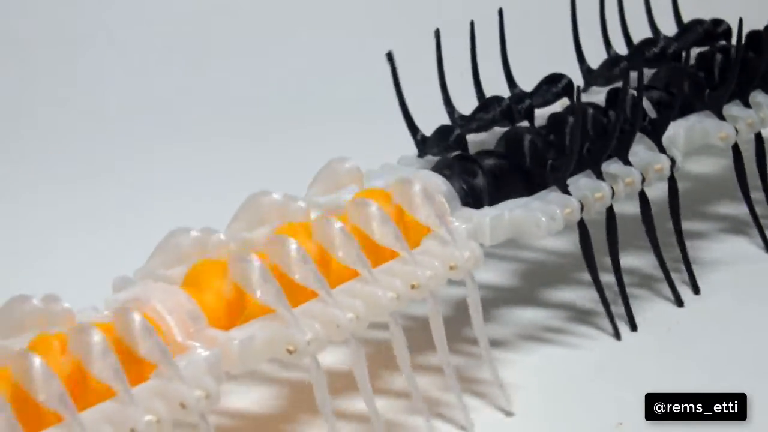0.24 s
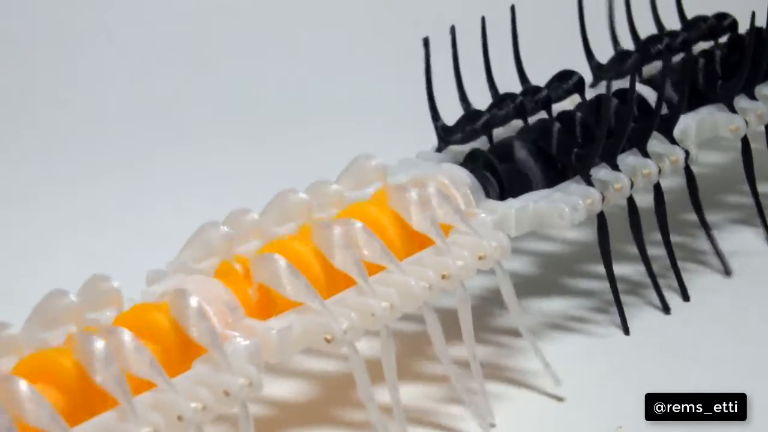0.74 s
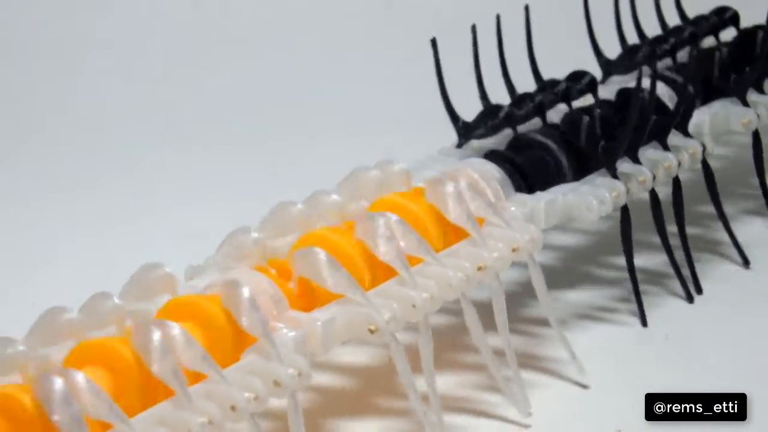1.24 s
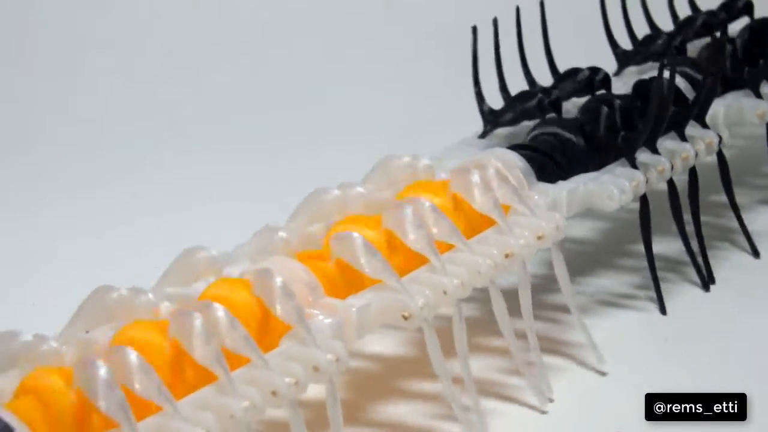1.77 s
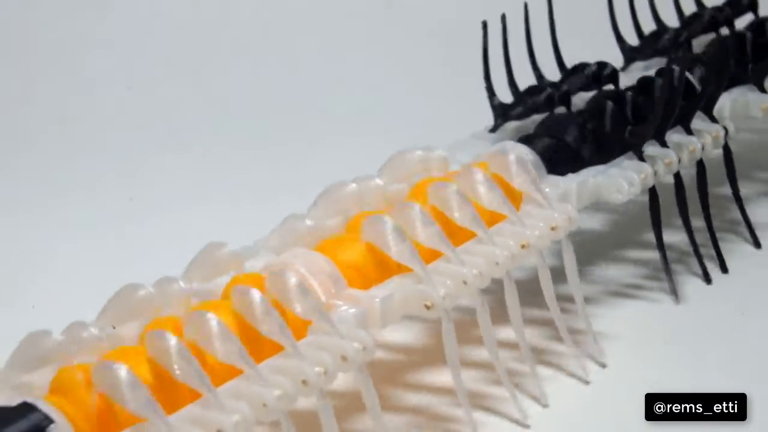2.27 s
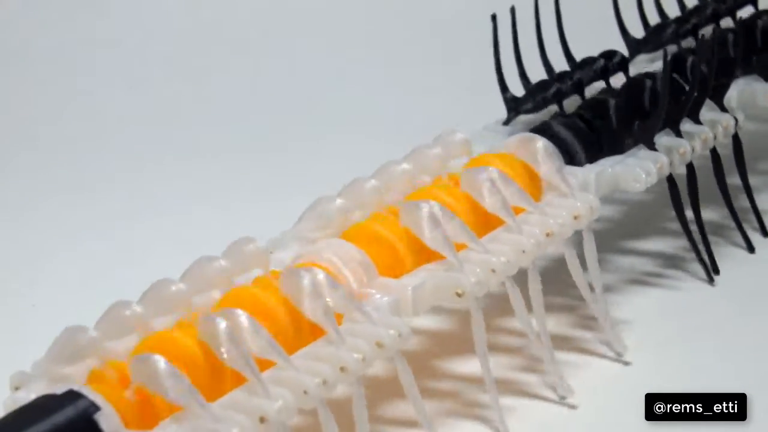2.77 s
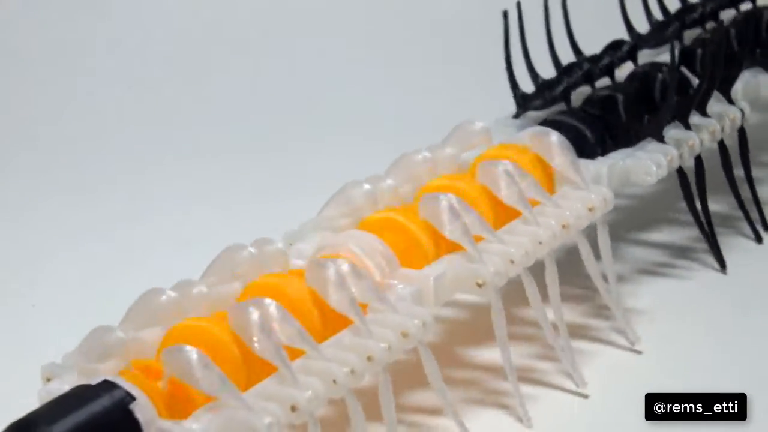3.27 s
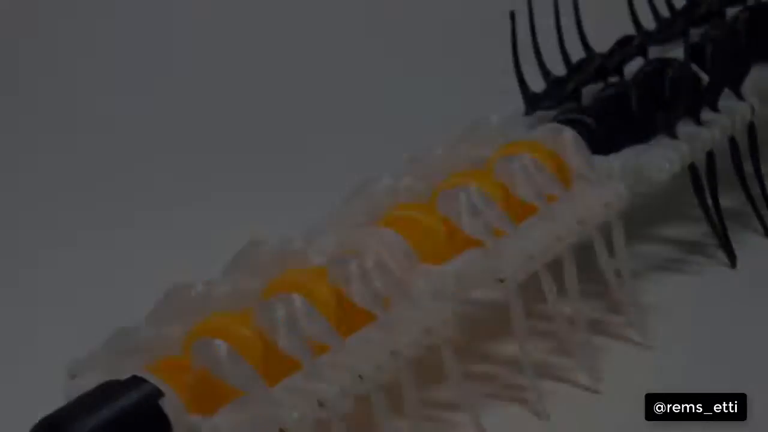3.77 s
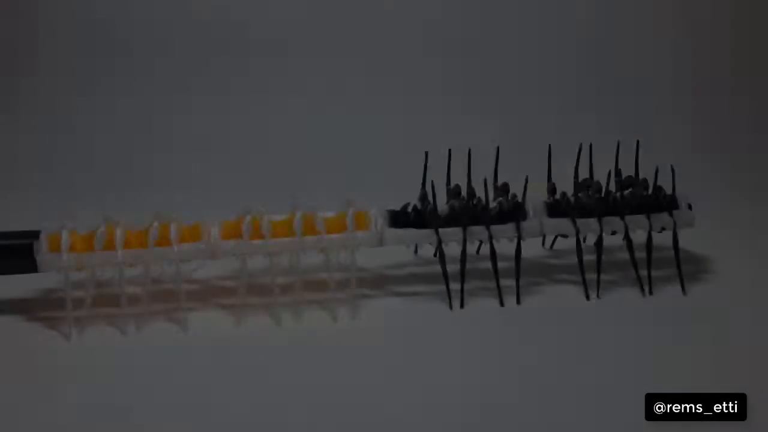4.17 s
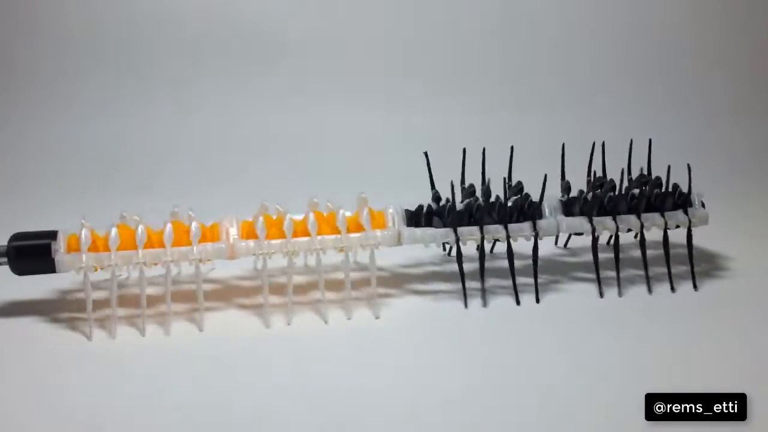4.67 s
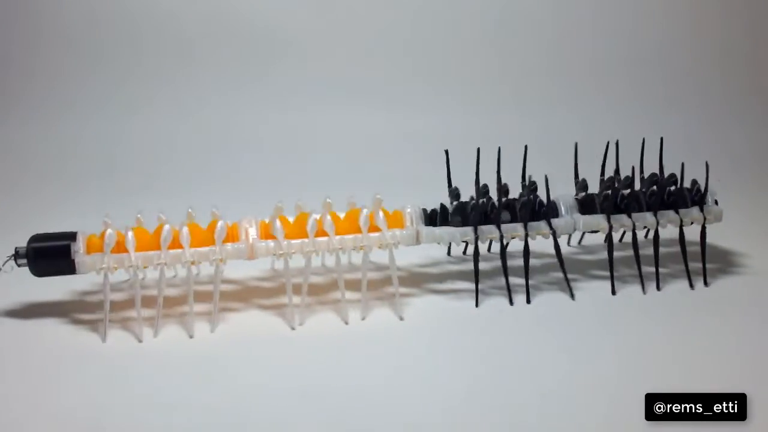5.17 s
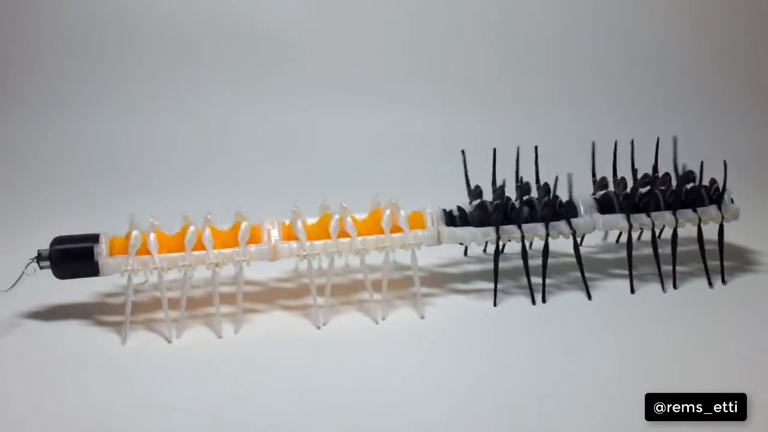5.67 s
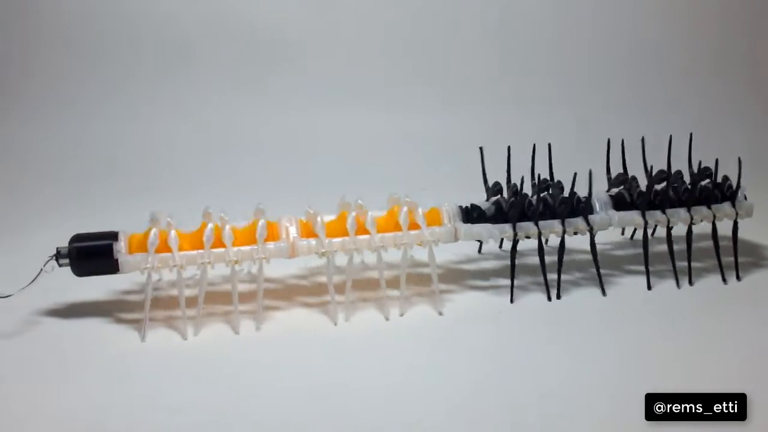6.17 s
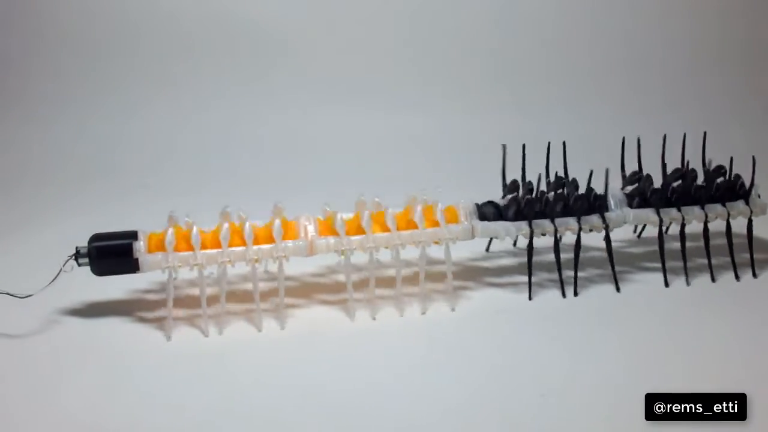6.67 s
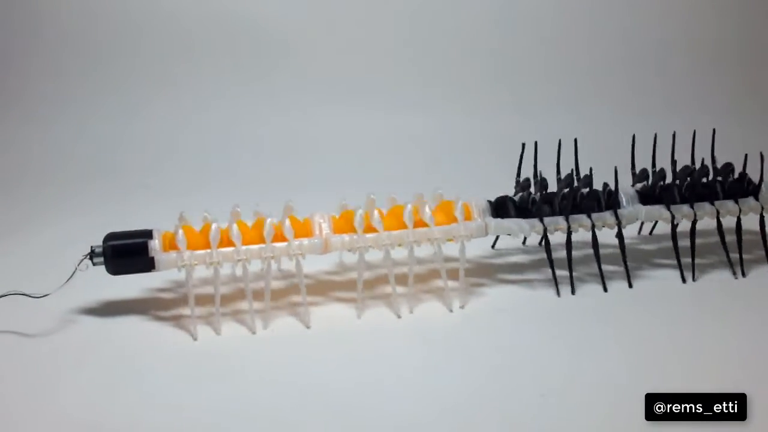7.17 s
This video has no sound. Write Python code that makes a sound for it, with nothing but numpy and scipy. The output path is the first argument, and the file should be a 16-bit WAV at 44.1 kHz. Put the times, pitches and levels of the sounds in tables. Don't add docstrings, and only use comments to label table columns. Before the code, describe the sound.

A small geared motor whirs with a bright, steady hiss while plastic joints squeak and tick in quick regular turns on a many-legged toy.

```python
import sys
import numpy as np
from scipy import signal
from scipy.io import wavfile

SR = 44100
rng = np.random.default_rng(int(sys.argv[2]) if len(sys.argv) > 2 else 0)


def how_loud(loudness_db):
    steps = np.asarray(loudness_db, float) / 20
    return 10 ** steps


def wrap_up_sound(samples):
    columns = np.atleast_2d(samples).T
    tamed = np.clip(columns, -1, 1)
    steps = np.round(tamed * 32767).astype(np.int16)
    wavfile.write(sys.argv[1], SR, steps)


N = 327222
TIME = np.arange(N) / SR

# start t/s, end t/s, shaft period/s, phase at t = 0 [0-1],
# low whine level/dB, high whine level/dB, half-speed whine level/dB
VIEWS = [
    (0, 4.55, .447, 0, -47, -47, -56.5),
    (3.54, 7.42, .449, .17, -47.5, -48.5, -55.5),
]
# f/Hz, width/Hz, near level/dB, far level/dB
FRAME = [(150, 8.4, 4.5, 2.5), (237, 15, 3, 3), (300, 22, 3, 4), (370, 36, 9, 1.5), (389, 50, -1, 6.5),
         (720.6, 40, 5.5, 5), (875, 145, 1.5, 2.5), (1340, 120, 5, 3), (1780, 240, 2.5, 3),
         (2392, 106, 4.5, 1), (3134, 1130, 3.5, 3), (5040, 360, 1.5, 1), (5900, 190, 4, 1.5)]


def in_time(rows):
    s, *columns = np.transpose(rows)
    return [np.interp(TIME, s, c) for c in columns]


def at_hz(points, hz):
    f, value = np.transpose(points)
    return np.interp(np.log(hz), np.log(f), value)


def far_share():
    return np.interp(TIME, [3.5, 4.6], [0, 1])


def low_noise(hz, size, channels):
    r = np.exp(-2 * np.pi * hz / SR)
    white = rng.standard_normal((channels, size + 800))
    x = signal.lfilter([1], [1, -2 * r, r * r], white)[:, 800:]
    return x / np.sqrt((1 + r * r) / (1 - r * r) ** 3)


def drift(rate_hz):
    size = N // 40 + 2
    return np.interp(np.arange(N) / 40, np.arange(size), low_noise(40 * rate_hz, size, channels=1)[0])


def stereo(mid, side, hz):
    # f/Hz, left-right likeness
    likeness = [(60, 0.32), (150, 0.76), (380, 0.83), (950, 0.73), (2380, 0.63), (5500, 0.26),
                (8000, -0.12), (10500, -0.042), (15000, -0.25)]
    # f/Hz, share heard a quarter cycle late on the right
    lateness = [(3000, -0.019), (4500, .1), (6300, 0.13), (8000, 0.15), (10500, 0.064), (12500, .05),
                (14000, -.1)]
    # f/Hz, left minus right level/dB
    left_right = [(60, -1), (130, -3), (290, -3.0), (640, -1.5), (1410, -5.5), (3100, -3.5), (6820, -2),
                  (15000, 1.5)]
    alike = np.clip(at_hz(likeness, hz), -.9, .9)
    late = np.clip(at_hz(lateness, hz), -.4, .4)
    lean = how_loud(at_hz(left_right, hz) / 2 * np.array([[1], [-1]]))
    delayed = -np.gradient(mid) / np.sin(2 * np.pi * hz / SR)
    unlike = np.sqrt(max(1 - alike ** 2 - late ** 2, 0))
    return lean * np.array([mid, alike * mid + late * delayed + unlike * side])


def rough_tone(hz, width_hz, clean):
    a, b, c, d = low_noise(width_hz / 2, len(hz), channels=4) * np.sqrt(1 - clean)
    steady = np.sqrt(2 * clean)
    angle = 2 * np.pi * np.cumsum(hz) / SR
    mid = (a + steady) * np.sin(angle) + b * np.cos(angle)
    side = c * np.sin(angle) + (d + rng.choice([-1, 1]) * steady) * np.cos(angle)
    return stereo(mid, side, np.mean(hz))


def effort():
    # part of turn [0-1], level/dB
    load = [(0, -0.6), (.12, -1.5), (.27, 0.2), (.35, -1.4), (.5, -0.7), (.62, 0.5), (.75, 1.53),
            (.87, 1.3), (1, -0.5)]
    # t/s, level/dB
    nearness = [
        [(0, -1.5), (1.5, -1.96), (1.9, -0.4), (3.2, -0.5), (4.55, 0)],
        [(3.54, 0.5), (4.7, -0.5), (5.1, -0.7), (7.42, 0.2)],
    ]
    cams, hiss = 1e-9, 1e-9
    for (start, end, turn_s, phase, *_), approach in zip(VIEWS, nearness):
        on = (TIME >= start) & (TIME <= end)
        near_db, = in_time(approach)
        load_db = np.interp((TIME / turn_s + phase) % 1, *np.transpose(load))
        load_db = load_db + 0.51 * drift(5.1)
        cams = cams + on * how_loud(2 * (near_db + load_db))
        hiss_db = -1.34 + 0.44 * near_db + 0.17 * load_db
        hiss = hiss + on * how_loud(2 * hiss_db)
    return 10 * np.log10(cams), 10 * np.log10(hiss)


def rubbing(cams_db, hiss_db, patchy_db=1.39, shared_db=0.35, chatter_db=1.0):
    # t/s, level/dB
    rumble = [(0, -5.5), (.5, -3.5), (2.2, -2.5), (2.78, -1), (2.85, 3), (3.38, 3.5), (3.45, 1), (3.55, 6),
              (4.54, 5.5), (4.58, 0.5), (5.8, -1.3), (6.2, 1.5), (7.05, -0.5), (7.42, 0)]
    # f/Hz, level/dB per Hz
    near = [(18, -59), (30, -29), (118, -8.5), (189, -7), (374, -6), (526, -8.5), (721, -5), (1070, -3),
            (1860, 1), (2060, 0), (2350, -0.5), (5040, -1.5), (7270, -4), (14800, -0.5), (16000, -37)]
    # f/Hz, level/dB per Hz
    afar = [(18, -59), (30, -19), (70, -33), (115, -9), (189, -10.5), (384, -6), (473, -9), (1280, -1),
            (1460, -1), (1760, 0), (5900, -3), (8080, -5.5), (11700, -0.5), (14800, -6), (16000, -35)]
    rumble_db = in_time(rumble)[0] + 1.1 * drift(9.2)
    far = far_share()
    white = rng.standard_normal((2, 2, N))
    grainy = white * how_loud(chatter_db * low_noise(310, N, channels=1))
    together = drift(14)
    bounds_hz = 22 * 2 ** np.arange(0, 9.7, 1 / 3)
    out = 0
    for k, (low, high) in enumerate(zip(bounds_hz, bounds_hz[1:])):
        hz = min(np.sqrt(low * high), 14500)
        source = grainy if hz > 1800 else white
        third_octave = signal.butter(2, [low, high], "band", fs=SR, output="sos")
        mid, side = signal.sosfilt(third_octave, source[k % 2])
        if hz < 330:
            effort_db = rumble_db
        elif hz < 1000:
            effort_db = .7 * cams_db
        else:
            effort_db = cams_db if hz < 10500 else hiss_db
        colour_db = (1 - far) * at_hz(near, hz) + far * at_hz(afar, hz)
        flicker_db = np.clip(hz / 4000, .2, 1) * (shared_db * together + patchy_db * drift(31.0))
        out = out + how_loud(colour_db + effort_db + flicker_db) * stereo(mid, side, hz)
    return how_loud(-28.5) * out


def body(x):
    # f/Hz, width/Hz, near level/dB, far level/dB
    can = [(11060, 200, 1, 0), (11450, 250, 1, 0.5), (12700, 150, 4.5, -1)]
    out, far = x.copy(), far_share()
    for hz, width_hz, near_db, far_db in [*FRAME, *can]:
        r = np.exp(-np.pi * width_hz / SR)
        lift = (1 - far) * how_loud(near_db) + far * how_loud(far_db) - 1
        poles = [1, -2 * r * np.cos(2 * np.pi * hz / SR), r * r]
        out += lift * signal.lfilter([(1 - r * r) / 2, 0, (r * r - 1) / 2], poles, x)
    return out


def whines(wobble_hz=170, flutter_db=4.0):
    # part of turn [0-1], low f/Hz, low level/dB, high f/Hz, high level/dB
    gear_turn = [(0, 11400, 6, 14500, 2), (.1, 11760, 5, 14900, 6), (.25, 12500, 2, 15660, 3),
                 (.36, 11500, 2.5, 14600, 3), (0.49, 10550, 4, 13800, -3), (.6, 11140, -2, 14500, 3),
                 (.72, 12300, -5, 15500, 3), (.88, 11600, 0.5, 14800, 2), (1.001, 11300, 4.5, 14400, 0)]
    # low, high, half-speed width/Hz
    widths_hz = (600, 800, 220)
    out = np.zeros((2, N))
    part, low_hz, low_db, high_hz, high_db = np.transpose(gear_turn)
    pitches, swells = (low_hz, high_hz, low_hz / 2), (low_db, high_db, low_db)
    for start, end, turn_s, phase, *levels_db in VIEWS:
        on = slice(int(start * SR), int(end * SR))
        at = (TIME[on] / turn_s + phase) % 1
        for hz, db, width_hz, level_db in zip(pitches, swells, widths_hz, levels_db):
            pitch = np.interp(at, part, hz) + wobble_hz * drift(9)[on]
            loudness_db = level_db + np.interp(at, part, db) + flutter_db * drift(38)[on]
            out[:, on] += how_loud(loudness_db) * rough_tone(pitch, width_hz, clean=0)
    return out


def hum():
    # f/Hz, rms level/dB
    mains = [(59.8, -80), (120, -66)]
    lines = sum(how_loud(db + 6 + 1.3 * drift(3.1)) * np.sin(2 * np.pi * hz * TIME) for hz, db in mains)
    return lines * how_loud(np.array([[-1.2], [1.2]]))


def flecks(cams_db, level_db=-50, spread_db=-1.0, length_s=.045, width_hz=55, scatter=0.0703):
    when, mode, off, long, glide, force = rng.random((450, 6)).T
    s = when * 7.38
    hz = np.array(FRAME)[5 + (mode * 8).astype(int), 0] * (1 + scatter * (2 * off - 1))
    db = level_db + 1.07 * cams_db[(s * SR).astype(int)] + spread_db * (2 * force - 1)
    db = db - 4.3 * abs(np.log2(hz / 2400))
    end_hz = hz * (1 + 0.041 * (glide - .6))
    return list(zip(s, length_s * (.5 + long), hz, end_hz, width_hz + 0 * s, db, 0 * s))


def widened(rows):
    return [(s, length, a_hz, b_hz, 27 + 0.032 * a_hz, db, 0) for s, length, a_hz, b_hz, db in rows]


def looped_slips(spread_db=2.5):
    # part of turn [0-1], length/s, start f/Hz, end f/Hz, level/dB
    rough_spots = [
        [(.52, 0.017, 4680, 4600, -52), (0.5, .063, 8830, 11000, -53), (0.5, 0.057, 2200, 2370, -46),
         (.55, .1, 5700, 4700, -50), (.62, .07, 3000, 3400, -49.5), (.72, 0.065, 3300, 3400, -48.5),
         (.19, 0.025, 6550, 5900, -55)],
        [(.62, 0.069, 8830, 11000, -52), (.52, .07, 5400, 5800, -49.5), (.68, .05, 4400, 5300, -53),
         (.6, .08, 5400, 4600, -47.5), (.14, 0.084, 2950, 3350, -47.5), (.05, .03, 5050, 5100, -46),
         (.69, 0.073, 2780, 2500, -45.5), (.8, 0.064, 1720, 1680, -53.5)],
    ]
    rows = []
    for (start, end, turn_s, phase, *_), spots in zip(VIEWS, rough_spots):
        for count in range(18):
            for (part, *shape, db), luck in zip(spots, rng.standard_normal((len(spots), 2))):
                s = (count + part - phase) * turn_s + .004 * luck[0]
                if start < s < end - .02:
                    rows.append((s, *shape, db + spread_db * luck[1]))
    return widened(rows)


def joint_slips():
    # t/s, length/s, level/dB
    long_joint = [(.249, 0.069, -41), (.707, .022, -42.5), (1.148, 0.11, -44), (1.595, 0.063, -42.5),
                  (2.037, 0.06, -41), (2.485, 0.058, -43.5), (2.971, .012, -36), (3.753, 0.067, -35),
                  (4.215, .07, -38.5), (4.668, 0.064, -35.5), (5.112, .058, -37), (5.572, 0.073, -39),
                  (6.01, 0.06, -38.5), (6.464, .08, -39.5), (6.908, 0.064, -42), (7.344, 0.066, -38.5)]
    long_octave = [(3.76, .04, -40), (4.225, .03, -44), (5.117, .046, -45), (6.014, .035, -40.4),
                   (6.907, 0.048, -39), (7.349, .021, -39.5)]
    long_tail = [(4.28, 0.043, -47), (4.73, 0.063, -44), (5.17, 0.04, -45), (5.64, .04, -43),
                 (6.075, .04, -38.5), (6.54, .04, -42)]
    low_joint = [(.569, 0.014, -38), (1.012, 0.03, -39), (1.069, 0.012, -39), (1.455, 0.024, -41),
                 (1.91, 0.023, -39), (1.963, .027, -43), (2.06, .05, -48), (2.354, 0.028, -40),
                 (2.55, 0.061, -44), (2.8, 0.033, -41), (3.25, .012, -37.5), (4.212, 0.012, -39),
                 (6.382, .019, -46), (7.3, 0.036, -45)]
    low_afar = [(4.988, 0.011, -38), (5.44, 0.02, -40), (5.875, .022, -44), (6.33, .019, -42),
                (6.78, .02, -45), (7.23, 0.018, -43)]
    falling_joint = [(.62, 0.027, -39), (1.047, .017, -39), (1.515, 0.028, -39), (1.939, 0.021, -36),
                     (2.38, .048, -38), (2.846, 0.049, -36.5), (3.276, .057, -37), (3.737, .02, -38),
                     (4.113, 0.02, -42), (4.193, 0.051, -39), (4.566, 0.0337, -36.5), (5.014, 0.037, -43.5),
                     (5.47, .03, -43), (5.936, .024, -39.5), (6.386, .021, -42), (7.261, 0.031, -42)]
    falling_tail = [(1.96, .03, -43), (2.41, .035, -44), (2.885, 0.039, -43), (3.315, 0.032, -40)]
    tick_joint = [(.89, 0.017, -41), (1.37, 0.017, -41), (1.904, .011, -39), (1.98, .015, -42),
                  (2.347, .018, -35.3), (2.715, 0.01, -37), (2.785, 0.018, -40), (3.154, .027, -39),
                  (3.612, 0.018, -36), (4.155, .018, -40), (6.965, .015, -44)]
    ping_joint = [(.214, .025, -37.5), (1.575, .017, -38.5), (2.459, 0.014, -38), (2.906, 0.024, -38),
                  (2.945, .036, -41), (3.396, 0.02, -33.5), (3.858, 0.016, -35)]
    ping_octave = [
        (3.395, .021, -36.5),
        (4.315, .021, -35),
    ]
    high_joint = [(.592, 0.033, -33.5), (1.488, 0.02, -34.5), (2.823, .025, -33), (3.155, .02, -36),
                  (3.676, .034, -36), (4.586, 0.066, -41), (5.049, .077, -44), (5.457, .033, -36.5),
                  (5.91, .035, -40), (6.36, 0.028, -39), (6.807, 0.019, -33.5)]
    rising_joint = [(.205, 0.027, -40.6), (.652, .03, -43), (1.099, .03, -45), (1.994, .037, -46),
                    (2.445, .02, -44), (3.329, .034, -41), (5.509, .038, -46), (5.961, .028, -40.6),
                    (6.415, .03, -44)]
    snap_joint = [(.843, .024, -36), (1.298, .016, -34), (1.745, .017, -37), (2.187, .022, -35),
                  (3.083, .021, -38), (4.442, .035, -32.5)]

    def sing(rows, start_hz, end_hz, width_hz, glide=0, flat_hz=0):
        return [(s, length, start_hz, end_hz + glide * length, width_hz, db, flat_hz)
                for s, length, db in rows]

    return (sing(long_joint, 2880, 2850, 80, glide=-1100, flat_hz=150)
            + sing(long_octave, 5680, 5650, 180, flat_hz=244)
            + sing(long_tail, 2720, 2540, 120)
            + sing(low_joint, 2390, 2360, 190)
            + sing(low_afar, 2500, 2460, 120)
            + sing(falling_joint, 6090, 6090, 160, glide=-5000)
            + sing(falling_tail, 5100, 5000, 350)
            + sing(tick_joint, 4970, 5080, 380)
            + sing(ping_joint, 4640, 4620, 190)
            + sing(ping_octave, 9150, 9110, 200)
            + sing(high_joint, 11070, 11400, 420, glide=-6000)
            + sing(rising_joint, 10520, 10620, 280)
            + sing(snap_joint, 12280, 12160, 610))


def stray_slips():
    # t/s, length/s, start f/Hz, end f/Hz, level/dB
    strays = [(.405, .082, 11560, 12200, -42), (.851, .028, 13560, 13310, -39.4),
              (.946, .011, 14070, 14090, -39), (1.296, 0.018, 13400, 13210, -39),
              (1.872, .053, 9460, 9300, -46), (2.462, .054, 14140, 14730, -49),
              (2.763, .018, 6570, 6510, -42.4), (2.875, .017, 1780, 1730, -42),
              (3.292, 0.026, 1246, 1340, -40), (3.722, .027, 1740, 1933, -38),
              (3.99, 0.019, 11800, 11900, -42), (4.022, .022, 1440, 1570, -39),
              (4.04, .05, 11300, 12200, -37), (4.093, .027, 14670, 15220, -35),
              (6.744, .022, 6180, 6530, -41), (6.765, .045, 15440, 15430, -45),
              (7.194, 0.024, 6580, 6660, -50), (7.2, 0.25, 150, 152, -59), (7.226, .044, 15350, 15370, -45)]
    return widened(strays)


def squeaks(rows, boost_db=3.0, clean=0.6):
    out = np.zeros((2, N))
    for s, length, start_hz, end_hz, width_hz, db, flat_hz in rows:
        i = int(s * SR)
        part = np.linspace(0, 1, int(length * SR))[:N - i]
        swell = np.sin(np.pi * part ** 0.79) ** 0.32
        onset_hz = flat_hz * np.exp(-part * length / 0.0113)
        glide_hz = (end_hz - start_hz) * np.clip(1.2 * part, 0, 1.1) ** 2.18
        tone = swell * rough_tone(start_hz - onset_hz + glide_hz, max(width_hz, 30), clean)
        out[:, i:i + len(part)] += how_loud(db + boost_db - 1.5) * tone / np.sqrt(np.mean(tone ** 2))
    return out


def ticks(rows, low_hz, high_hz, decay_s, under_db):
    out, t = np.zeros((2, N + 2000)), np.arange(2000) / SR
    envelope = (1 - np.exp(-t / 0.00074)) * np.exp(-t / decay_s)
    for s, db in rows:
        i = int(s * SR)
        out[:, i:i + len(t)] += how_loud(db - under_db) * envelope * rng.standard_normal((2, len(t)))
    band = signal.butter(2, [low_hz, high_hz], "band", fs=SR, output="sos")
    mid, side = signal.sosfilt(band, out[:, :N] + 1e-18) * np.sqrt(SR / 2 / (high_hz - low_hz))
    return stereo(mid, side, np.sqrt(low_hz * high_hz))


def cam_drops():
    # t/s, peak level/dB
    bright = [(0.0368, -23), (0.2314, -21), (0.4344, -27), (0.4818, -26), (0.6015, -20), (0.6769, -25),
              (0.848, -22), (0.9313, -27), (1.1238, -27), (1.2999, -20), (1.495, -24), (1.7739, -27),
              (2.1251, -29), (2.1899, -24), (2.2707, -24), (2.7112, -27), (2.833, -25), (3.0854, -25),
              (3.1607, -22), (3.3573, -28), (3.5438, -24), (3.6925, -22), (4.0452, -24), (4.1066, -23),
              (4.3091, -29), (4.4463, -22), (4.5321, -26), (4.5925, -28), (4.8993, -24), (5.3487, -25),
              (5.4685, -26), (5.9145, -29), (6.2667, -28), (6.3634, -29), (6.8119, -25), (7.2804, -25)]
    # t/s, peak level/dB
    dull = [(0.1211, -33), (0.2179, -25), (0.7138, -28), (0.8315, -29), (1.0136, -33), (1.1223, -32),
            (1.3718, -30), (1.4601, -33), (1.6092, -24), (1.9061, -29), (1.9854, -27), (2.3555, -25),
            (2.4638, -26), (2.7182, -30), (2.7921, -31), (2.8759, -30), (2.9457, -27), (3.4022, -27),
            (3.5483, -30), (3.6197, -27), (3.7, -28), (3.8624, -29), (4.1594, -26), (6.9731, -30)]
    return (ticks(bright, 10800, 15000, decay_s=.005, under_db=7.0)
            + ticks(dull, 4500, 5500, decay_s=.007, under_db=4.0))


def scene():
    cams_db, hiss_db = effort()
    slips = joint_slips() + stray_slips() + looped_slips() + flecks(cams_db)
    toy = body(rubbing(cams_db, hiss_db)) + whines() + squeaks(slips) + cam_drops()
    lean_db = np.interp(TIME, [3.5, 4.6], [-.15, .15])
    return toy * how_loud(lean_db * [[1], [-1]]) + hum()


def roll_off(x):
    return signal.sosfilt(signal.butter(12, 16000, fs=SR, output="sos"), x)


def record(dry):
    steep = signal.ellip(12, .5, 90, 15720, fs=SR, output="sos")
    return roll_off(signal.sosfilt(steep, dry))


dry = scene()
out = record(dry)
wrap_up_sound(out)
```